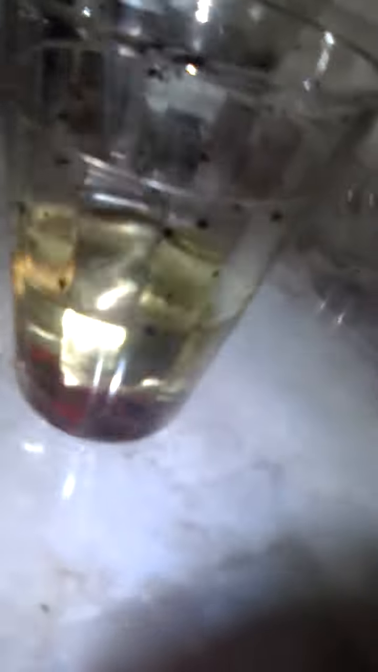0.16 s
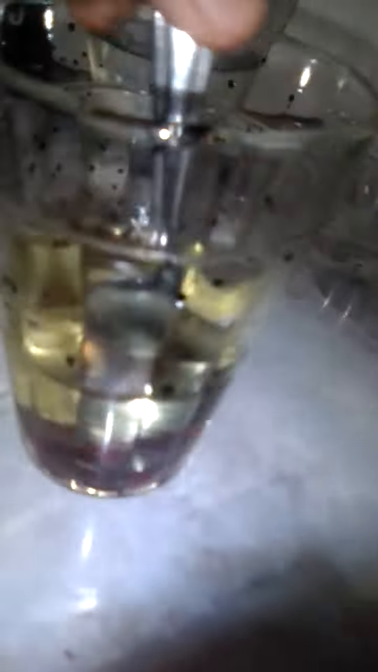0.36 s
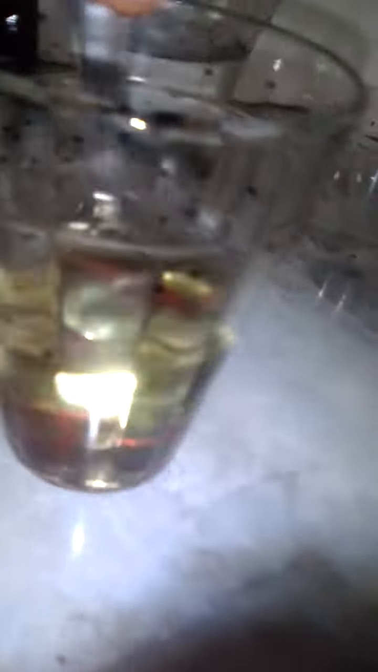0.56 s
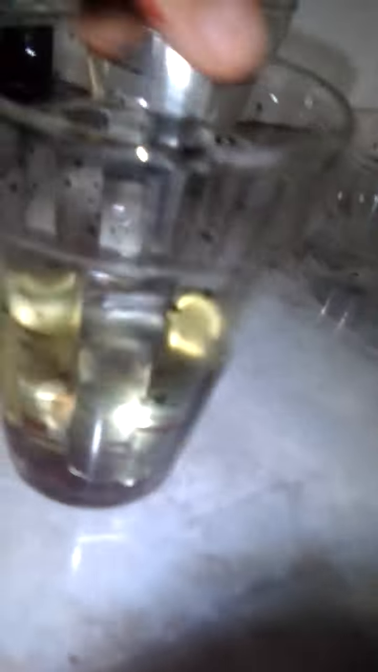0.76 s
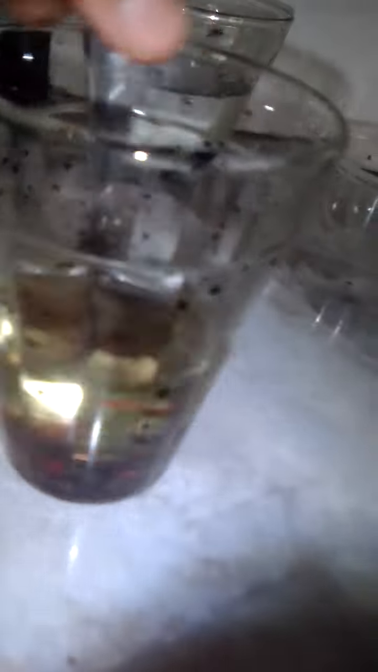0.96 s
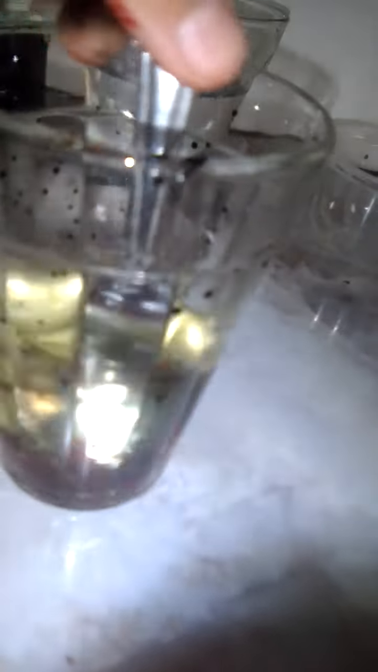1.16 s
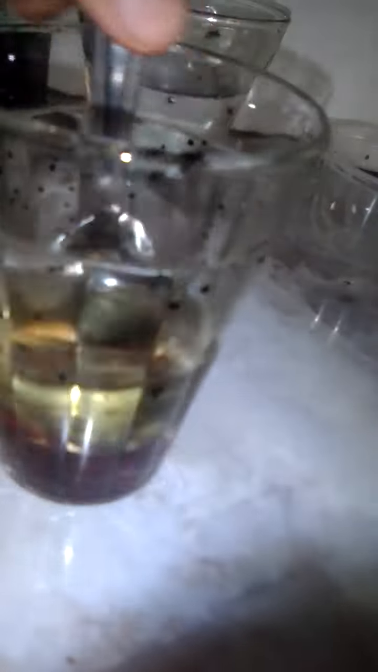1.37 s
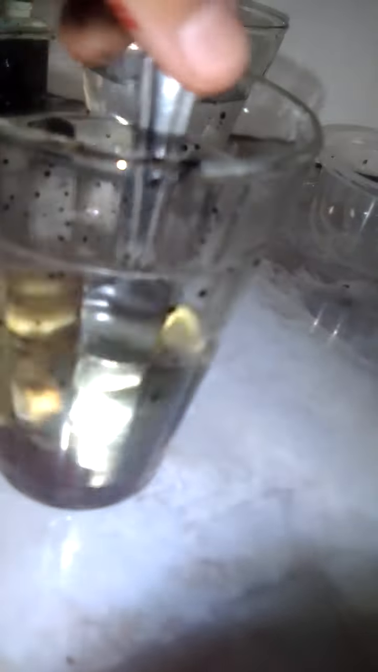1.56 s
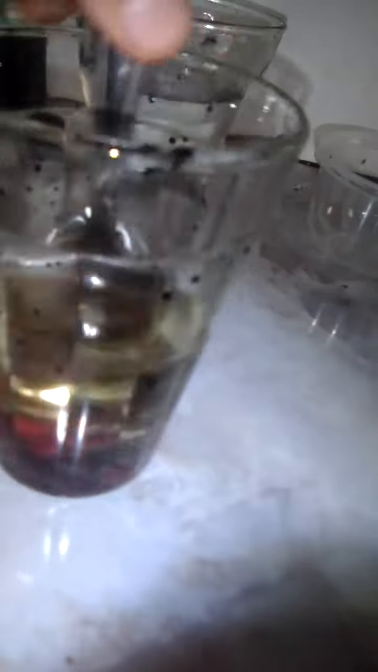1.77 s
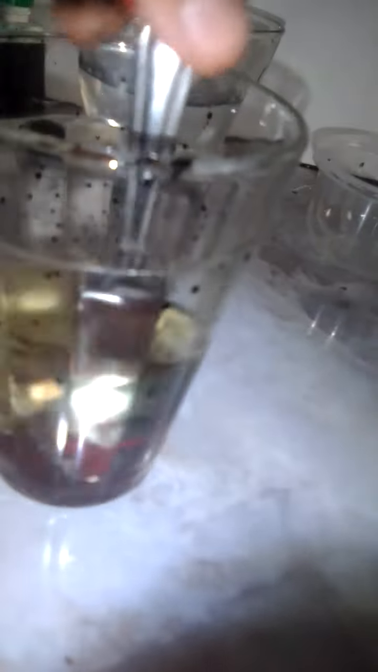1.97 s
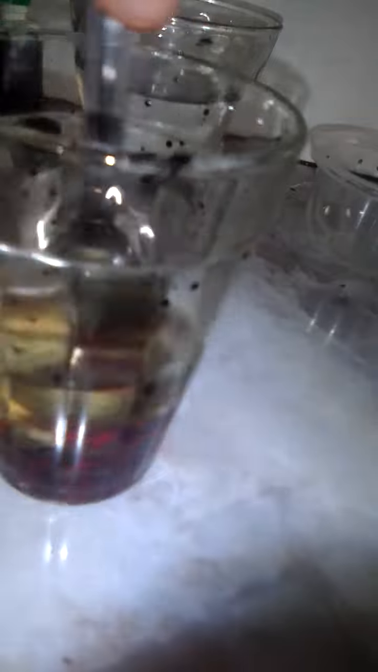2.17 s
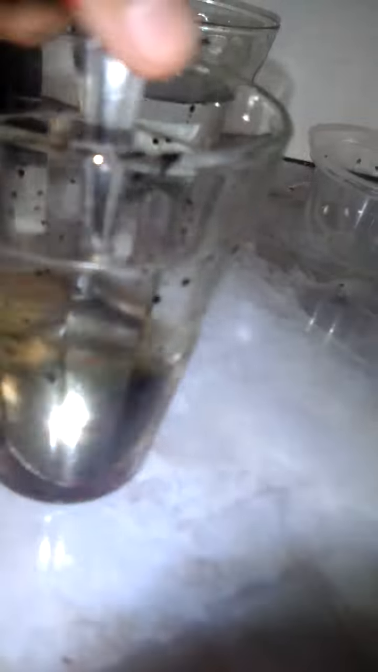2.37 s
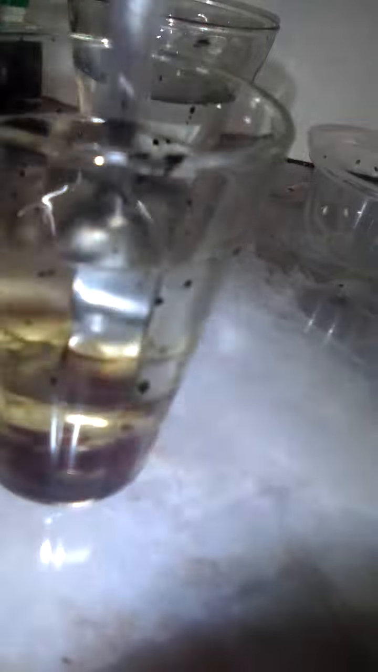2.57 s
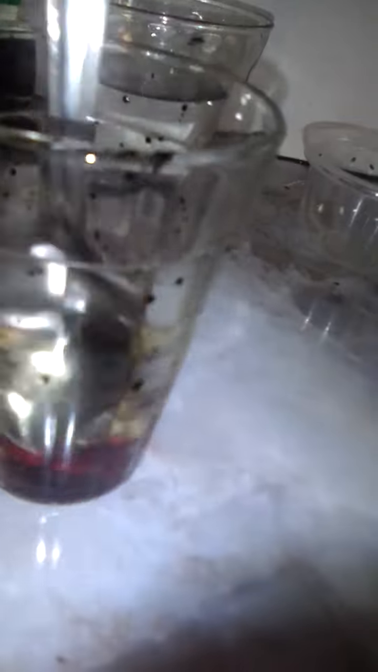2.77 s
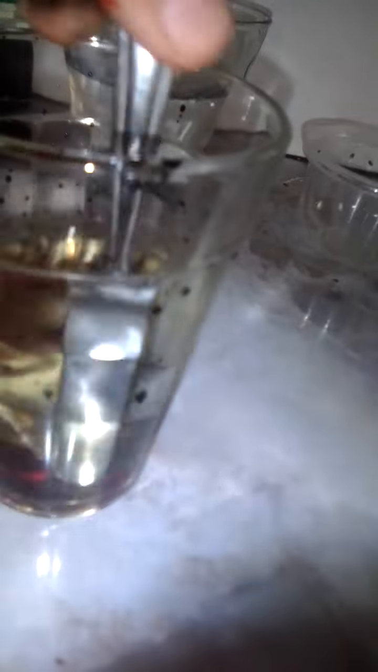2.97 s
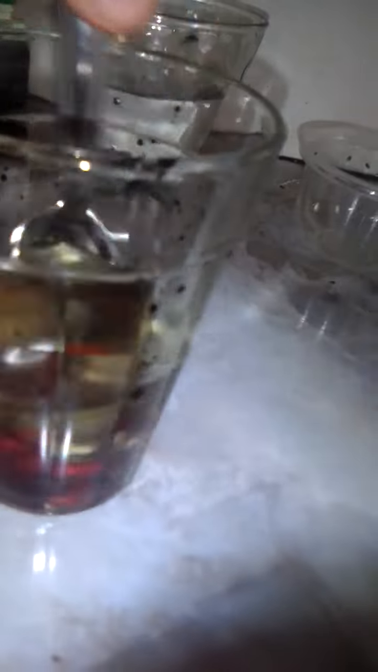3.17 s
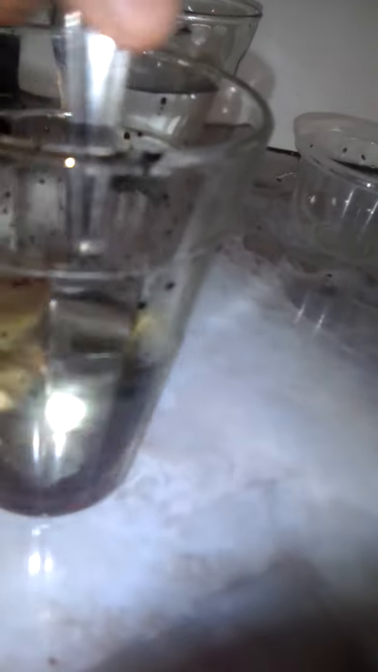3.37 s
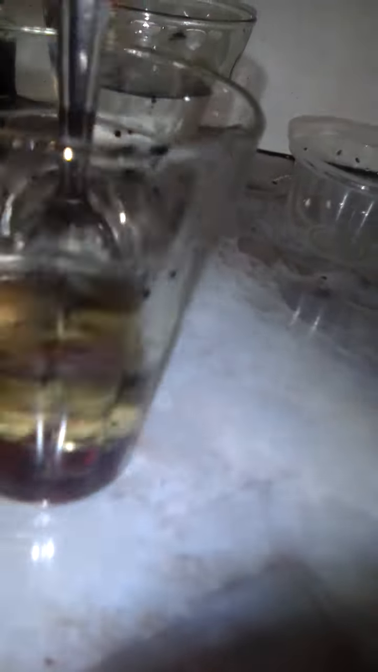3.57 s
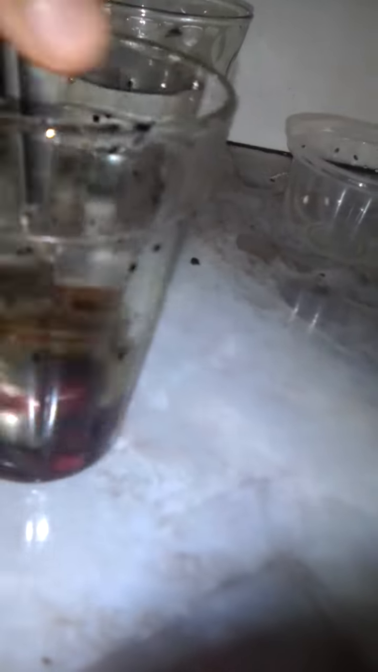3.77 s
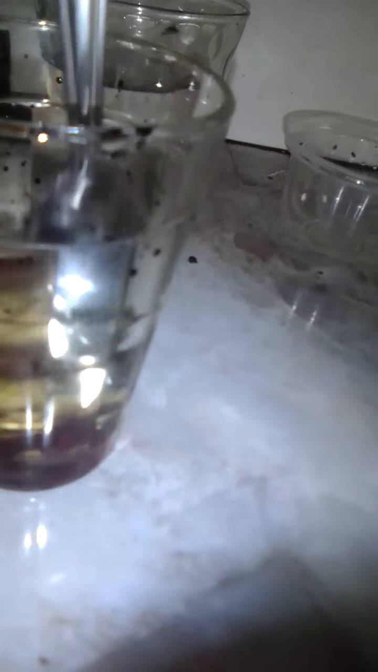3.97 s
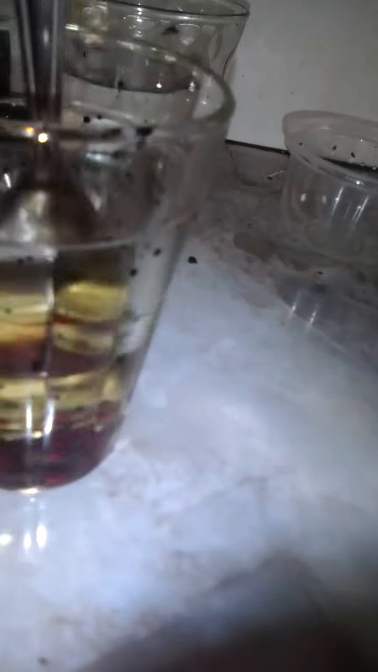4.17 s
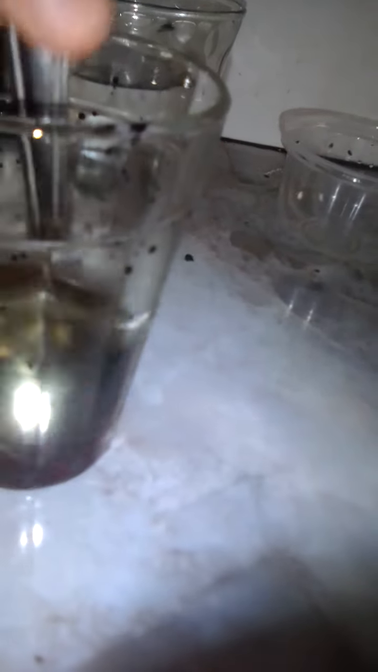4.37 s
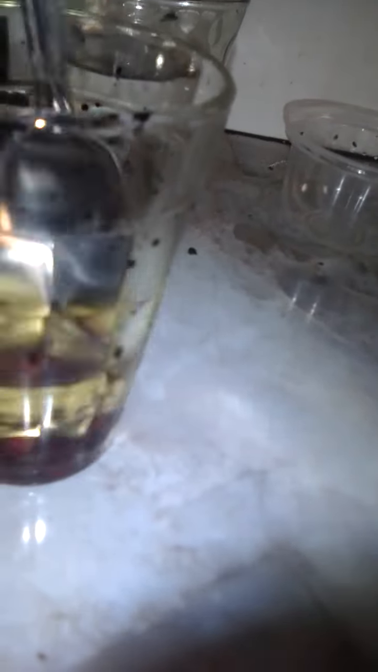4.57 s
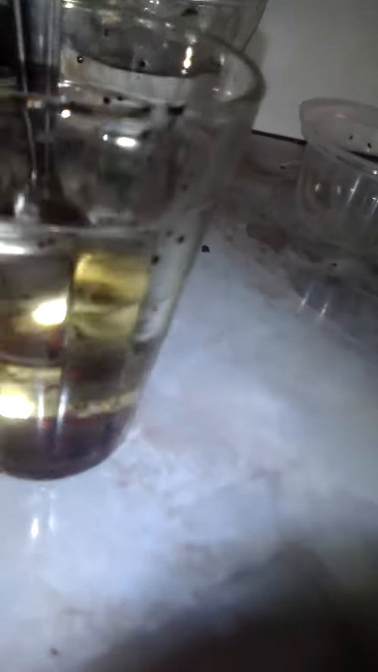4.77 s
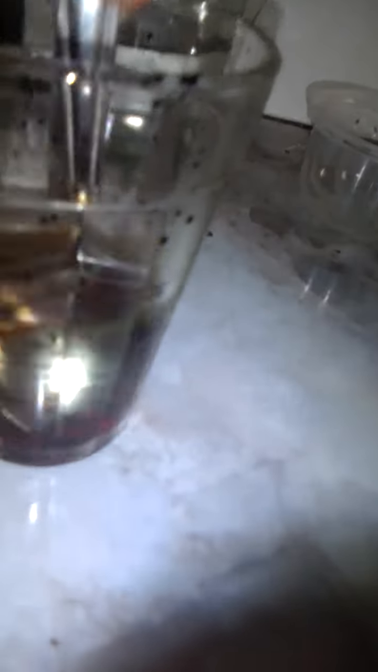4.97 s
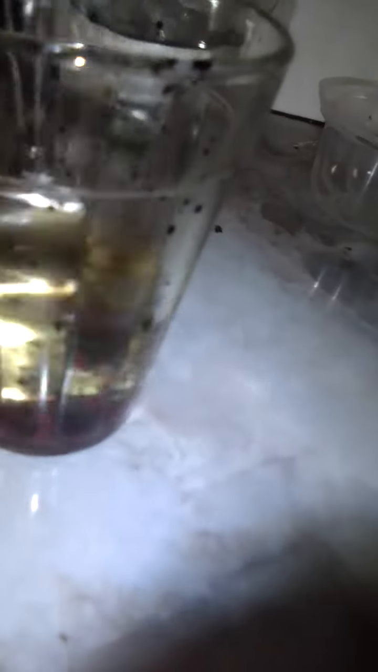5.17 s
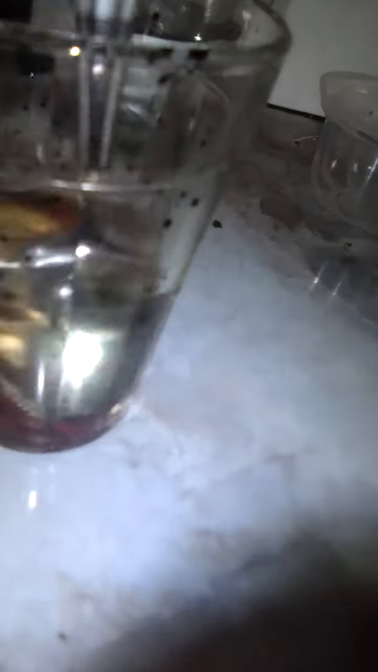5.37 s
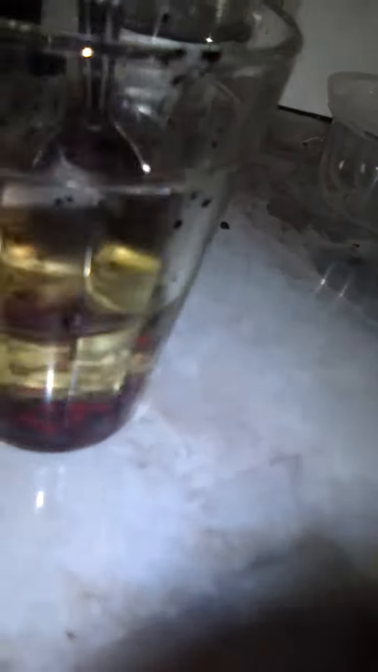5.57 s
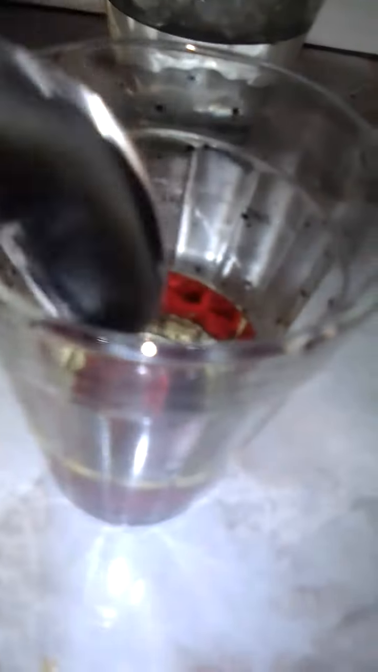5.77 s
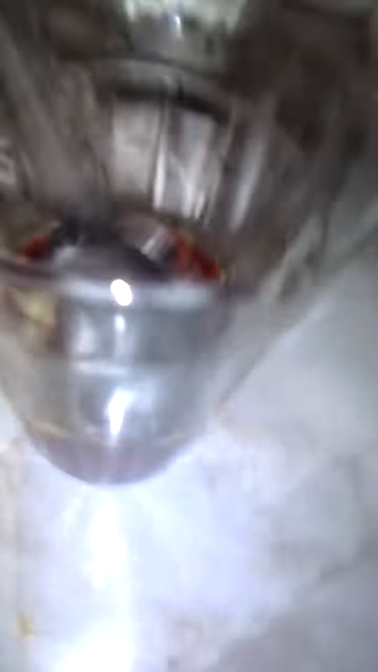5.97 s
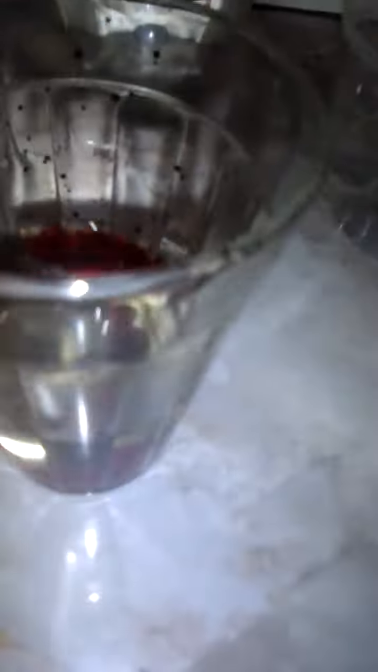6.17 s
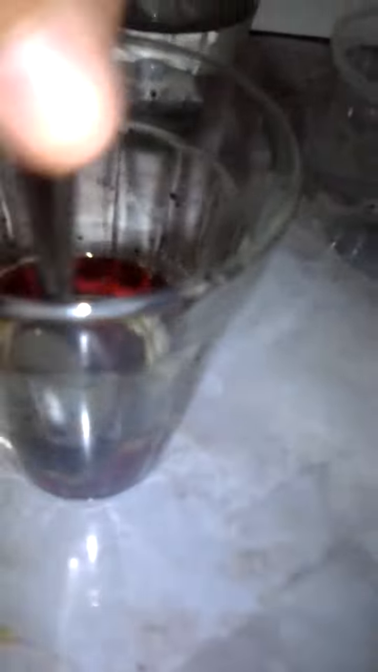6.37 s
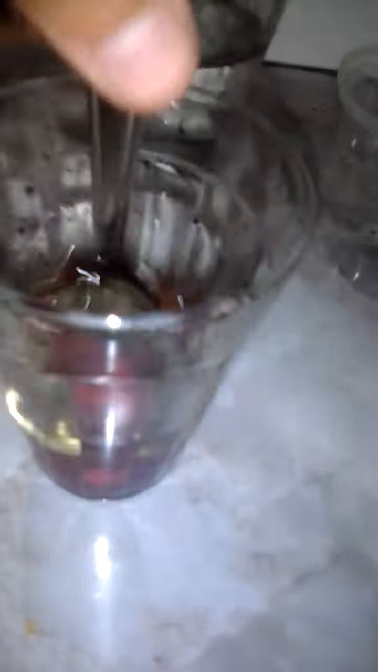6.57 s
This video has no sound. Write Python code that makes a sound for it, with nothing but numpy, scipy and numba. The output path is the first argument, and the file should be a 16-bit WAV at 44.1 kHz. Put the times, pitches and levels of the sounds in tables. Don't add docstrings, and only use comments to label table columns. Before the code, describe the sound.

A steel spoon stirs liquid in a thick tumbler on a stone counter. Bright, high clinks come about two or three a second, unevenly strong, each with a short damped glassy ring and a small base thud. Faint rubbing, slosh and light ticks fill the gaps. Near the end the stem scrapes briefly over the rim, then stronger clinks return. Close phone microphone, small reflective kitchen, low quiet drone.

```python
import sys
import numpy as np
from scipy import signal
from scipy.fft import rfft, irfft
from scipy.io import wavfile
from scipy.ndimage import uniform_filter1d
from numba import njit

SR = 44100
rng = np.random.default_rng(int(sys.argv[2]) if len(sys.argv) > 2 else 0)


def volts(x):
    e = np.asarray(x, float) / 20
    return 10 ** e


def persist_wave(psi):
    counts = np.round(np.clip(psi, -1, 1) * 32767).astype(np.int16)
    wavfile.write(sys.argv[1], SR, np.atleast_2d(counts).T)


N = 291942

# start t/s, oval, top and third mode level/dB, snap level/dB against the ping
LANDING = [(.33, -5, -12, 0, -43), (.4, -8, -25, -4, -35), (.804, -3, -27.5, -4, -48),
           (1.01, 4, 7, -2, -28), (1.17, -10, -26, 3, -50), (1.3, 2, -30, -2, -46),
           (1.598, -4, -40, -4, -51.5), (1.9, -24, -16, 0, -26), (1.989, 3, -21, 5, -32.5),
           (2.429, -3, -36, 2, -25), (2.56, -14, -42, -1, -59), (2.895, 0, -11.5, -8, -32),
           (3.03, -4, -14, 5, -31), (3.201, -3, 4, -2, -16), (3.427, 10, 4.5, -14, -41),
           (3.859, -1, -16, 2, -34), (4.046, -12, -31, 1, -40), (4.487, -10, -15, -1, -28),
           (4.957, -2, -5, -3, -21), (5.048, -16, 5, 1, -34), (5.197, -8, 9, 2, -25),
           (5.381, -22, -28, 1, -37), (5.99, -9, -3, -2, -21.5), (6.253, -2, 6, 4, -26),
           (6.322, -7, -2, 4, -28.5), (6.57, -6, 0, -8, -26)]
# f/Hz, level/dB
CRACK = [(300, -20), (1000, 6.5), (2500, 6.5), (4000, 0.5), (7000, 2), (9000, -28), (13000, -28),
         (16000, -32)]
# f/Hz, level/dB
SLOSH = [(200, -8), (600, -2), (1500, -3.5), (2300, -11), (3000, -24), (8000, -44.5)]


def colour(x, points):
    hz, db = np.transpose(points)
    grid = np.linspace(1, SR / 2, 1025)
    log_gain = np.interp(np.log(grid), np.log(hz), db) * np.log(10) / 20
    cepstrum = irfft(log_gain)
    cepstrum[1:1024] *= 2
    cepstrum[1025:] = 0
    response = irfft(np.exp(rfft(cepstrum)))
    return signal.fftconvolve(x, response)[:len(x)]


def curve(table, axis):
    table = np.array(table)
    return np.interp(np.arange(N) / SR, table[:, 0], table[:, axis])


def blows(times, db):
    x = np.full(N, 1e-18)
    np.add.at(x, (np.asarray(times) * SR).astype(int), volts(db))
    return x


@njit
def ring(x, hz, t60, rise, keep):
    y, z, w = np.empty(len(x)), 0j, 0j
    soft = np.exp(-1 / (rise * SR))
    for i in range(len(x)):
        turn = np.exp(complex(0., 2 * np.pi * hz[i] / SR))
        w = w * turn * soft + (1 - soft) * x[i]
        decay = np.exp(-np.log(1000.) / t60[i] / SR)
        z = z * keep[i] * turn * decay + w
        y[i] = z.imag
    return y


def modes(x, table, bend, rise, keep):
    return sum(volts(db) * ring(x, hz * bend, np.full(N, 1. * t60), rise, keep) for hz, db, t60 in table)


def walk(rate):
    k = int(SR / rate)
    steps = np.repeat(rng.standard_normal(N // k + 1), k)
    x = uniform_filter1d(uniform_filter1d(steps, k), k)[:N]
    return x / x.std()


def grit(per_s, scatter_db):
    ticks = (rng.random(N) < per_s / SR) * rng.standard_normal(N)
    x = ticks * volts(scatter_db * walk(rate=77))
    return x / x.std()


def held(times, values):
    last = np.searchsorted(np.asarray(times) * SR - 1, np.arange(N)) - 1
    return np.asarray(values)[np.maximum(last, 0)]


def landing(times, axis, table=LANDING):
    place = np.searchsorted(np.array(LANDING)[:, 0], times) - 1
    return np.array(table)[np.maximum(place, 0), axis]


def touches():
    # t/s, ping level/dB, ping f/Hz, base thud level/dB, wall ring level/dB
    pressed = [(0.3352, -6.5, 6710, -40.5, -37), (0.3441, -12, 6430, -26.5, -30),
               (1.0171, -29.5, 7030, -44, -46.5), (1.6031, -9, 7335, -18.5, -26.5),
               (1.905, -46, 6500, -36, -59), (1.9944, -2, 6484, -19.5, -30.5),
               (2.5642, -22, 6880, -53, -41.5), (2.8999, 4, 6560, -32.5, -32),
               (2.9093, -5, 6500, -28.5, -32), (3.2755, -37.5, 6930, -56, -61.5),
               (3.4321, -0.5, 6570, -25.5, -34), (3.8757, -19, 6440, -20.5, -28),
               (4.3296, -36, 5450, -43, -64), (5.0527, 0.5, 6650, -40, -26.5),
               (5.386, -17.5, 6100, -22.5, -37), (5.457, -22.5, 6710, -45.5, -46.5),
               (6.0101, -20, 6850, -39, -45), (6.3274, -5, 7470, -17, -34.5)]
    # same columns, t/s, level/dB, f/Hz, level/dB, level/dB
    bounced = [(0.0687, -27, 7290, -32.5, -51), (0.5014, -11, 7150, -29, -41),
               (0.8095, -2.5, 6525, -20, -25), (1.1747, -18, 6620, -22.5, -33),
               (1.3129, -41, 7420, -42, -42), (1.5577, -39, 7360, -33, -45),
               (1.9223, -19, 7240, -28.5, -29.5), (2.4339, -19, 6470, -26, -41.5),
               (3.0355, -30, 7240, -46, -50), (3.8642, -9.5, 6620, -51, -39),
               (3.8875, -28, 7300, -26, -35.5), (4.0512, -38.5, 6830, -54, -43),
               (4.4921, 1.5, 6540, -33.5, -25.5), (4.6208, -40.5, 6670, -51, -59),
               (4.9623, -21, 6950, -26, -58), (5.2023, -3, 6500, -29, -19), (5.9955, -10, 6800, -33.5, -21),
               (6.0801, -48, 6800, -73, -58), (6.257, -3.5, 6810, -30.5, -16.5),
               (6.5748, -8, 7030, -37.5, -19)]
    # same columns, t/s, level/dB,
    # f/Hz, level/dB, level/dB
    grazes = [(0.885, -26, 6650, -44, -48), (0.9675, -38, 7130, -46.5, -58),
              (1.0796, -31.5, 6700, -39, -52), (1.2645, -46.5, 6500, -62, -50),
              (1.2942, -43, 6870, -60, -53), (1.7494, -39.5, 6520, -72, -51),
              (2.5145, -42, 6620, -48.5, -54), (2.6015, -51, 6940, -71, -47.5),
              (2.9744, -32, 6580, -45.5, -42.5), (3.1545, -42.5, 6600, -84, -58.5),
              (3.3677, -46.5, 7190, -53, -65), (3.5151, -35.5, 6870, -56, -50.5),
              (5.2115, -11, 6470, -36.5, -42), (3.7786, -42.5, 6800, -45, -60.5),
              (3.9617, -44, 6760, -60.5, -68), (4.1365, -42, 7230, -72.5, -67),
              (4.369, -45, 5290, -56.5, -75.5), (5.592, -56.5, 6400, -70, -76),
              (.5876, -46, 6560, -65, -70), (1.5354, -42, 6910, -70, -62), (2.361, -48, 7350, -65, -62),
              (2.5391, -47, 6790, -70, -70), (2.806, -48, 7200, -70, -60), (3.5548, -44, 7220, -70, -65),
              (4.0173, -47, 6840, -70, -58), (4.0811, -45, 6840, -65, -65), (1.632, -32, 6450, -50, -50),
              (1.702, -42, 6820, -65, -65), (2.026, -28, 6500, -50, -52), (1.324, -48, 7200, -58, -55),
              (.758, -50, 6850, -70, -65), (2.64, -50, 7000, -70, -65)]
    # t/s, base thud level/dB
    bumps = [(0.4074, -35.5), (0.4624, -32), (0.765, -48.5), (1.134, -36.5), (1.1454, -40), (1.485, -33),
             (2.3694, -39.5), (2.7893, -42), (3.639, -32), (4.2422, -48), (.674, -50), (.725, -46),
             (1.061, -44), (1.104, -42), (1.5, -40), (1.52, -46), (2.995, -46), (3.647, -38), (3.743, -46),
             (4.292, -52), (4.315, -44), (5.528, -50), (3.239, -54)]
    bump_rows = [(s, db - 37, 6800, db, db - 33.5) for s, db in bumps]
    kinds = [(pressed, 0.023, 0), (bounced, 0.042, 0), (grazes, 0.025, -20), (bump_rows, 0.025, -20)]
    return np.transpose(sorted(tuple(row) + (t60, hard) for rows, t60, hard in kinds for row in rows))


def choke(share):
    s, *_, hard_db = touches()
    weight = np.where(hard_db == 0, 1, 0.1)
    contact = uniform_filter1d(blows(s - .001, 20 * np.log10(weight)), size=88)
    return share ** contact - 1e-4 * np.maximum(walk(rate=15), 0)


def tumbler(rub, dull):
    # f/Hz, level/dB, t60/s
    wall_modes = [
        [(1760, -15.5, 0.9)],
        [(4568, -10.5, 0.27), (4592, -21, .2)],
        [(7310, -15, 0.22), (7345, -7, 0.045), (7250, -21, 0.25), (7040, -22, .06)],
        [(8490, -16.5, 0.085)],
        [(1750, -12, .06)],
    ]
    # f/Hz, level/dB, t60/s
    base_modes = [(250, -13.5, 0.013), (415, -6, 0.03), (560, -6, 0.022), (666, -1, 0.03),
                  (714, 1.5, 0.042), (953, -8, 0.03), (1271, -4.5, 0.054), (1566, -10.5, 0.086),
                  (2122, -18, 0.044)]
    # second mode f/Hz, third mode f/Hz
    loaded = [(4557, 7320), (4563, 7220), (4538, 7320), (4547, 7320), (4552, 7300), (4558, 7250),
              (4537, 7340), (4572, 7330), (4535, 7330), (4533, 7320), (4579, 7300), (4538, 7300),
              (4566, 7280), (4565, 7330), (4542, 7300), (4508, 7320), (4572, 7300), (4530, 7350),
              (4560, 7300), (4561, 7340), (4503, 7170), (4548, 7370), (4615, 7300), (4566, 7190),
              (4567, 7225), (4478, 7060)]
    # clang level/dB against the wall, oval and second mode loss/(dB/s)
    damping = [(-6, 0, 0), (-2, 0, 0), (-6, 50, 20), (-4, 50, 20), (-3, 200, 0), (-4, 150, 0), (-8, 80, 0),
               (-18, 40, 40), (3, 0, 10), (-5, 30, 20), (-18, 60, 50), (-2, 50, 30), (-10, 60, 30),
               (-10, 60, 80), (0, 130, 70), (-12, 150, 200), (-16, 60, 50), (-2, 30, 0), (-5, 80, 60),
               (-9, 60, 0), (-1, 20, 0), (-30, 100, 40), (-10, 180, 120), (5, 280, 30), (4, 130, 90),
               (-6, 80, 250)]
    rise_s = [0.004, 0.0025, 0.0004, .001, .001]
    wet = [1.4, 1, 0, 0, 1.4]
    second_hz, third_hz, lift_s = 4568, 7320, .065
    s, ping_db, _, thud_db, wall_db, _, hard_db = touches()
    third_db = 0.48 * ping_db + 0.52 * wall_db - 0.5 + hard_db
    t = np.arange(N) / SR
    since = t - landing(t, axis=0)
    load = (landing(t, axis=0, table=loaded) / second_hz - 1) * np.exp(-(since / lift_s) ** 2)
    bend = (1 + load) * (1 + .001 * walk(rate=25))
    bends = [bend ** power for power in wet]
    bends[2] = landing(t, axis=1, table=loaded) / third_hz * (1 + .003 * walk(rate=30))
    late = 230 * np.clip((since - .115) / .04, 0, 1) * (t > LANDING[0][0])
    oval, second = (volts(-(landing(t, axis=k, table=damping) + late) / SR) for k in (1, 2))
    pushes = [blows(s, wall_db + landing(s, axis=1) + 12),
              blows(s, wall_db + 13.5),
              blows(s, third_db + landing(s, axis=3)),
              blows(s, wall_db + landing(s, axis=2) + hard_db + 9.5),
              blows(s, wall_db + landing(s, axis=0, table=damping) + 12)]
    rub_db = [-29.5, -26, -24, -39.0, -40]
    soaks = [oval, second, 1, 1, 1]
    keep = choke(share=0.13) * volts(-55 / SR)
    wall = np.zeros(N)
    for family, push, db, tune, rise, soak in zip(wall_modes, pushes, rub_db, bends, rise_s, soaks):
        loss = soak * keep ** np.sqrt(family[0][0] / second_hz)
        wall += modes(push + volts(db) * rub, family, tune, rise, loss)
    place = held(s, 1 + 0.033 * rng.standard_normal(len(s)))
    return wall + modes(blows(s, thud_db + 0.5) + volts(-33.5) * dull, base_modes, place, 0.00036, keep)


def spoon(rub):
    # f/Hz, level/dB, t60/s
    linger_modes = [(3190, -52, 0.05), (5230, -39.5, 0.1), (6500, -38.5, 0.28), (6680, -44, 0.39),
                    (6870, -37.5, 0.096)]
    # f/Hz, level/dB, t60/s
    knock_modes = [(1544, -5.5, 0.0062), (2577, -7.5, 0.0028), (3400, -5, 0.008), (4070, -3, 0.006),
                   (5280, -1, 0.006), (6010, 4, 0.011)]
    s, ping_db, ping_hz, thud_db, _, t60, hard_db = touches()
    push, keep = blows(s, ping_db), choke(share=0.31)
    grip, spot = rng.standard_normal((2, len(s)))
    ping = ring(push + volts(-29.0) * rub, held(s, ping_hz), held(s, t60), 0.0003, keep)
    linger = modes(push + volts(-7.5) * rub, linger_modes, held(s, 1 + 0.0048 * grip), 0.00061, keep)
    t = np.arange(SR // 10) / SR
    shape = (1 - np.exp(-t / 0.00014)) * (np.exp(-t / 0.0033) + volts(-17.5) * np.exp(-t / 0.011))
    strike = blows(s - .0008, thud_db + 6.5 + hard_db) + volts(-23.0) * push
    crack = signal.fftconvolve(strike, shape)[:N] * rng.standard_normal(N)
    splash = signal.fftconvolve(blows(s, thud_db - 7.5), shape)[:N] * rng.standard_normal(N)
    knock = modes(crack, knock_modes, held(s, 1 + .05 * spot), .0002, np.ones(N))
    return ping + linger + volts(-6.5) * colour(crack, CRACK) + volts(-24.5) * knock + colour(splash, SLOSH)


def snap():
    # f/Hz, level/dB
    edge = [(3000, -36), (8000, -18), (10000, 9.5), (13000, 1.5), (16500, -11.5)]
    s, ping_db, *_, hard_db = touches()
    db = ping_db + landing(s, axis=4) + hard_db
    t = np.arange(SR // 20) / SR
    shape = np.exp(-t / 0.0017) + volts(-23.0) * np.exp(-t / 0.0084)
    burst = signal.fftconvolve(blows(s - 0.0003, db + 4.5), shape)[:N]
    return colour(burst * rng.standard_normal(N), edge)


def strays():
    # t/s, f/Hz, level/dB, t60/s
    lone = [(.335, 10900, -42, 0.066), (0.343, 3400, -23, 0.035), (4.963, 250, -25.5, 0.078),
            (1.921, 3600, -32, 0.056), (2.433, 10800, -42, 0.056), (2.899, 5450, -22, 0.09),
            (3.876, 3250, -31, 0.077), (4.492, 10700, -46.5, 0.057), (5.052, 11000, -37, 0.073),
            (5.203, 10570, -25, 0.059), (5.996, 11000, -31, 0.069), (5.996, 3420, -32, 0.067),
            (6.08, 11050, -49, 0.049), (6.256, 3133, -24.5, 0.067), (6.257, 10900, -33.5, 0.06),
            (6.327, 4100, -33, 0.11), (1.996, 3250, -19, 0.04), (1.995, 7330, -12, .04),
            (1.995, 5700, -14, .015), (2.6, 1700, -47, .03), (2.596, 2500, -50, .02),
            (2.515, 1150, -44, .025), (1.748, 2790, -38.5, 0.02), (1.603, 6490, -16, .06),
            (1.603, 5990, -18, .03), (6.575, 6470, -14, .05), (5.203, 7300, -13, .045),
            (5.203, 7150, -13, .045), (5.203, 2100, -28, .03), (4.963, 690, -24, .05),
            (1.604, 700, -20, .04), (.069, 680, -36, .04), (5.387, 680, -28, .04), (4.493, 710, -34, .04),
            (2.901, 7700, -18, .015), (6.575, 3480, -38, .08), (5.386, 6650, -24, .04),
            (6.257, 2600, -28, .04), (4.095, 5950, -50, .08), (4.085, 1580, -50, .08),
            (3.962, 5200, -44, .03), (3.153, 2900, -48, .03), (3.153, 5000, -50, .03),
            (2.995, 3700, -46, .04), (1.08, 1270, -40, .04), (.502, 1270, -30, .05)]
    out, t = np.zeros(N + SR), np.arange(SR // 3) / SR
    for s, hz, db, t60 in lone:
        fade = (1 - np.exp(-t / 0.00024)) * np.exp(-np.log(1000) * t / t60)
        start = int(s * SR)
        out[start:start + len(t)] += volts(db) * fade * np.sin(2 * np.pi * hz * t)
    return out[:N]


def chatter():
    s, ping_db = touches()[:2]
    fade = np.exp(-np.arange(SR // 3) / SR / 0.054)
    force = signal.fftconvolve(blows(s, ping_db - 41), fade)[:N]
    return force * grit(per_s=2500., scatter_db=4.)


def strokes(axis):
    # start t/s, end t/s, bright rub on the wall level/dB, dull rub on the base level/dB
    rubbing = [(0, 0.053, -48.5, -50), (.1, 0.344, -61, -56), (0.363, 0.51, -57.5, -45.5),
               (0.504, 0.638, -66, -53), (0.644, 0.794, -59.5, -48.5), (0.86, 1.002, -58.5, -50),
               (1.028, 1.15, -71, -48.5), (1.207, 1.343, -65, -52.5), (1.41, 1.556, -62, -51.5),
               (1.665, 1.883, -64, -55), (2.022, 2.19, -54.5, -52.5), (2.331, 2.403, -57.5, -51),
               (2.482, 2.66, -57, -61), (2.929, 3.132, -59.5, -56.5), (3.314, 3.369, -60, -55),
               (3.511, 3.558, -58, -51), (3.64, 3.785, -69, -47), (3.89, 4.003, -63.5, -48.5),
               (3.993, 4.147, -55.5, -57), (4.233, 4.39, -71, -55), (5.427, 5.56, -60.5, -56.5),
               (6.02, 6.162, -57.5, -71), (6.355, 6.493, -56, -59)]
    force = np.zeros(N)
    for row in rubbing:
        force[int(row[0] * SR):int(row[1] * SR)] = volts(row[axis])
    return uniform_filter1d(force, size=1300)


def friction(rub, dull):
    # f/Hz, level/dB
    hiss = [(1500, -36), (4000, -17.5), (6000, -10.5), (6900, -3.5), (7600, -9.5), (9000, -30.5)]
    return volts(9) * colour(rub, hiss) + volts(9.5) * colour(dull, SLOSH)


def drag():
    # t/s, level/dB
    effort = [(5.62, -130), (5.66, -80), (5.68, -72), (5.73, -63), (5.79, -55), (5.81, -60), (5.835, -95),
              (5.86, -130)]
    # f/Hz, level/dB, t60/s
    rim_modes = [(740, -0.5, 0.018), (1230, -7, 0.0049), (1850, -8.5, .012), (2150, -1.5, 0.01),
                 (2900, -8, .006), (4620, 3, .045), (5150, -8, .01), (6800, -2.5, .03), (7300, -6.5, 0.025),
                 (8450, -19.5, .04), (11000, -22, 0.045)]
    # t/s, level/dB
    rattle = [(5.675, -46), (5.7064, -42), (5.7179, -40), (5.7399, -36), (5.7633, -36), (5.78, -36),
              (5.795, -38)]
    force = volts(curve(effort, axis=1)) * grit(per_s=2500., scatter_db=3.5)
    force = force + volts(-9) * blows(*np.transpose(rattle))
    rim = modes(force, rim_modes, 1 + .006 * walk(rate=40), 0.00022, np.ones(N))
    return rim + volts(12.0) * colour(force, CRACK)


def squeak():
    # t/s, f/Hz, level/dB
    glide = [(4.03, 3200, -90), (4.065, 3260, -60), (4.078, 3290, -68), (4.097, 3350, -54),
             (4.118, 3450, -70), (4.137, 3600, -54), (4.16, 3720, -70), (4.2, 3850, -95)]
    ticks, hz = grit(per_s=1500., scatter_db=5.), curve(glide, axis=1)
    partials = [(.49, -6), (1, -1), (1.8, -11.5)]
    slip = sum(volts(db) * ring(ticks, k * hz, np.full(N, .016), 0.0012, np.ones(N)) for k, db in partials)
    return volts(curve(glide, axis=2)) * slip / slip.std()


def room(x, t60=0.23, wet_db=-20):
    # f/Hz, level/dB
    walls = [(200, 6.5), (1000, 9), (3000, 8), (7000, 1), (10000, 2.5), (16000, -11.5)]
    t = np.arange(SR // 2) / SR
    tail = rng.standard_normal(len(t)) * np.exp(-np.log(1000) * t / t60) * (1 - np.exp(-t / 0.00063))
    return x + volts(wet_db) * signal.fftconvolve(colour(x, walls), tail / np.linalg.norm(tail))[:N]


def murmur(hz, t60, rise):
    x = ring(rng.standard_normal(N), np.full(N, hz), np.full(N, t60), rise, np.ones(N))
    return x / x.std()


def kitchen():
    # f/Hz, level/dB
    air_tone = [(15, -39.5), (25, -19), (70, -12), (131, 1), (349, 3), (1510, -12.5), (1780, -15),
                (1930, -15.5), (3810, -17), (4480, -23), (5570, -17.5), (6730, -25), (8140, -24.5),
                (15200, -28.5), (16500, -49)]
    # t/s, level/dB
    hum = [(0.0, -100), (0.13, -60), (0.24, -67.5), (1.53, -58.5), (3.34, -76.5), (6.62, -68.5)]
    # t/s, level/dB
    grip = [(0, -88), (.35, -70), (.75, -76), (1.0, -84.5), (6.62, -78.5)]
    air = colour(rng.standard_normal(N) * volts(0.3 * walk(rate=1.8)), air_tone)
    drone = volts(curve(hum, axis=1)) * murmur(145., .9, 0.0035)
    buzz = volts(-70) * murmur(355., .8, 0.0035)
    hand = volts(curve(grip, axis=1)) * murmur(58., .08, 0.0012)
    return volts(-59) * air / air.std() + buzz + drone + hand


def scene():
    # f/Hz, level/dB
    port = [(20, -32), (100, -30), (200, -9.5), (300, -1.5), (8000, -1.5), (10000, -4.5), (16000, -2.5),
            (18000, -33)]
    rub = strokes(axis=2) * grit(per_s=1200., scatter_db=5.) + chatter()
    dull = strokes(axis=3) * grit(per_s=1000., scatter_db=5.)
    contact = tumbler(rub, dull) + spoon(rub) + snap() + strays()
    near = room(contact + friction(rub, dull) + drag() + squeak())
    return (colour(near, port) + kitchen())[None]


@njit
def follow(x, release):
    e, y = 0., np.empty(len(x))
    for i in range(len(x)):
        e = max(abs(x[i]), e * release)
        y[i] = e
    return y


def band_limit(x):
    return signal.sosfilt(signal.butter(12, 16820, fs=SR, output="sos"), x)


def record(dry):
    top = .75
    peak = follow(np.roll(dry[0], -6), np.exp(-1 / (0.0035 * SR)))
    gain = uniform_filter1d(np.minimum(1, top / (peak + 1e-9)), size=8)
    return band_limit(dry * gain)


dry = scene()
out = record(dry)
persist_wave(out)
```